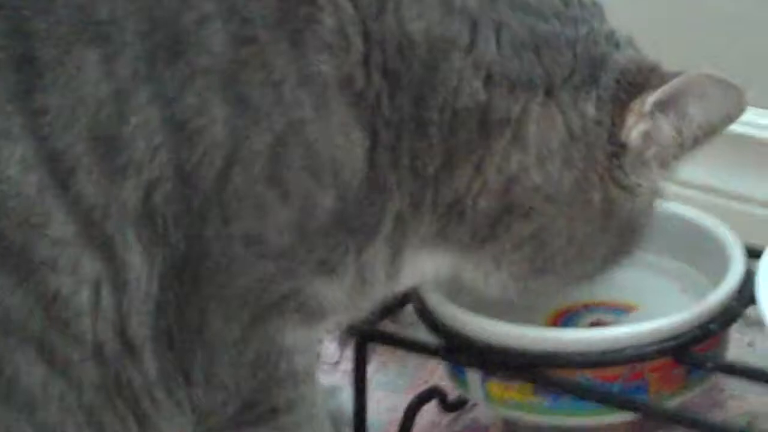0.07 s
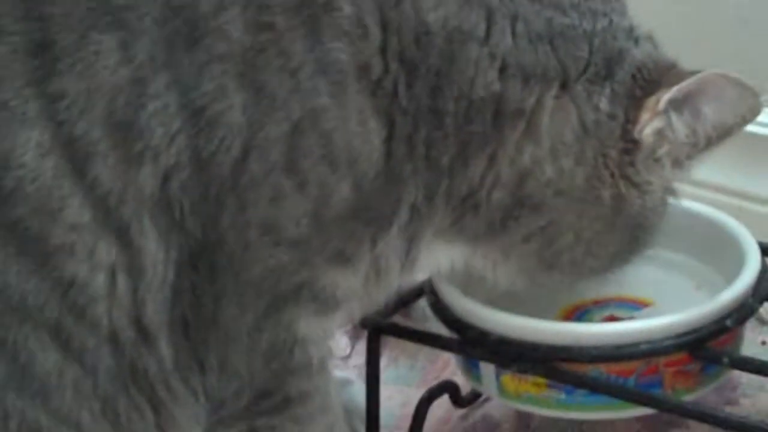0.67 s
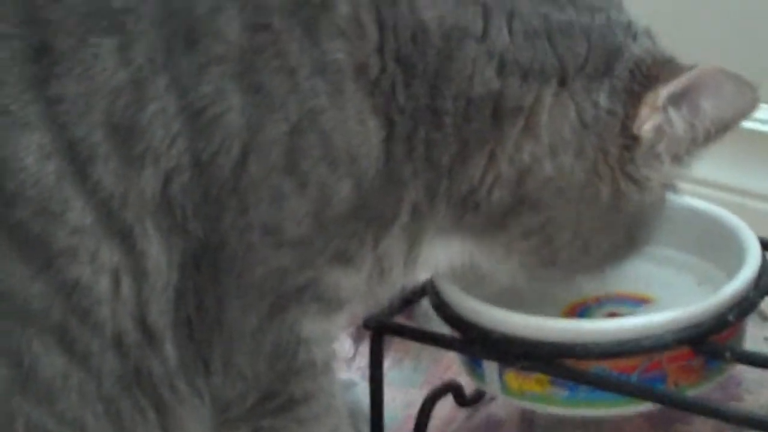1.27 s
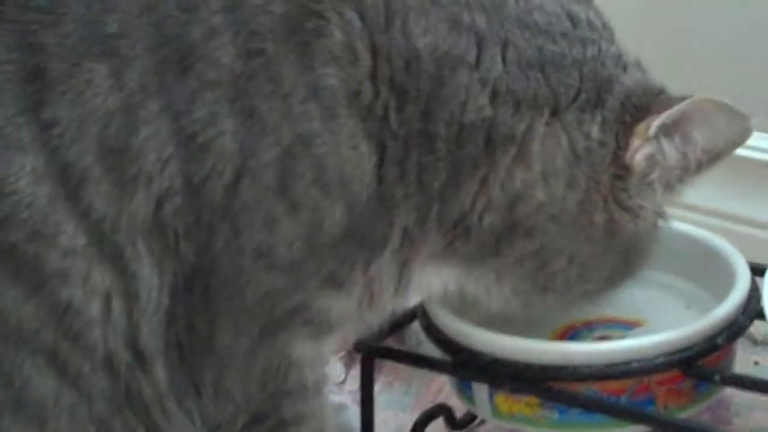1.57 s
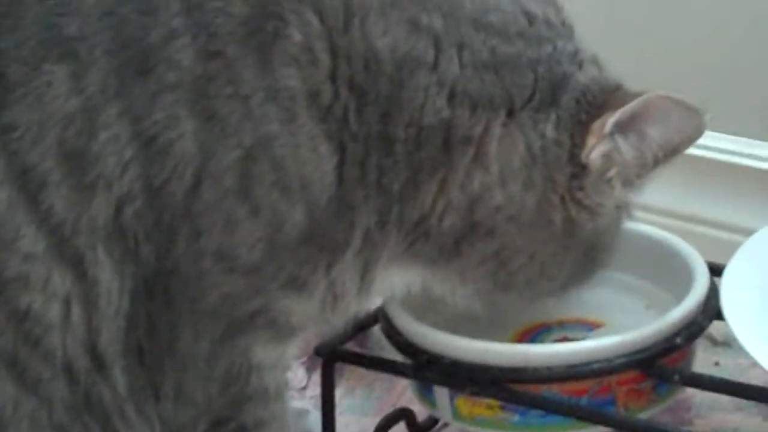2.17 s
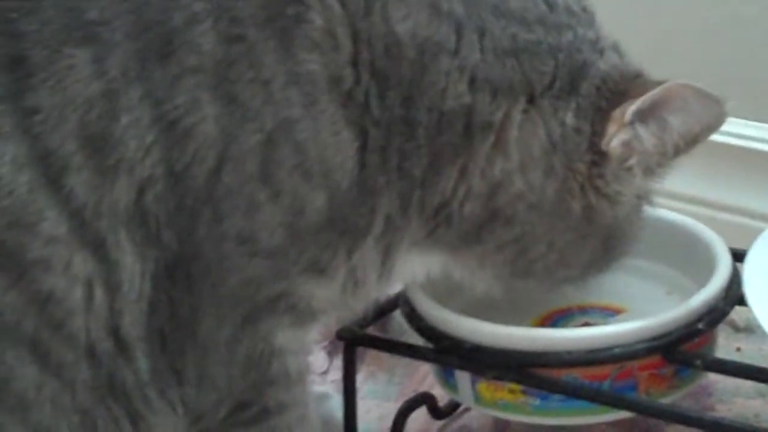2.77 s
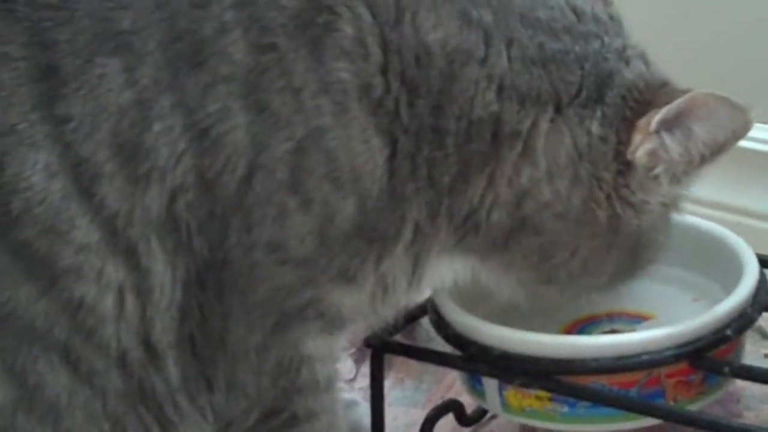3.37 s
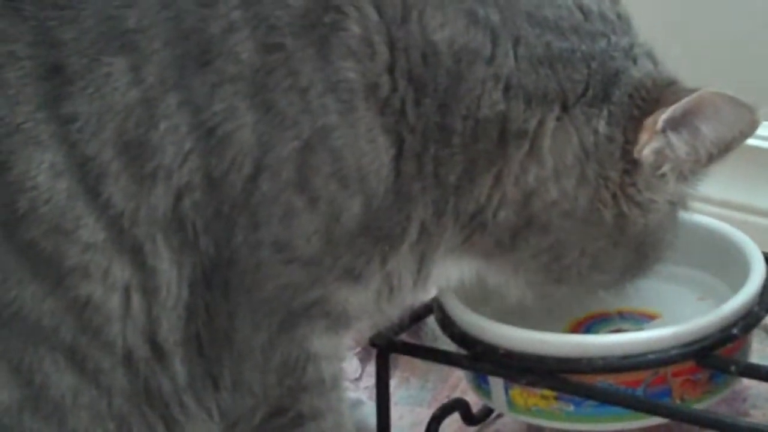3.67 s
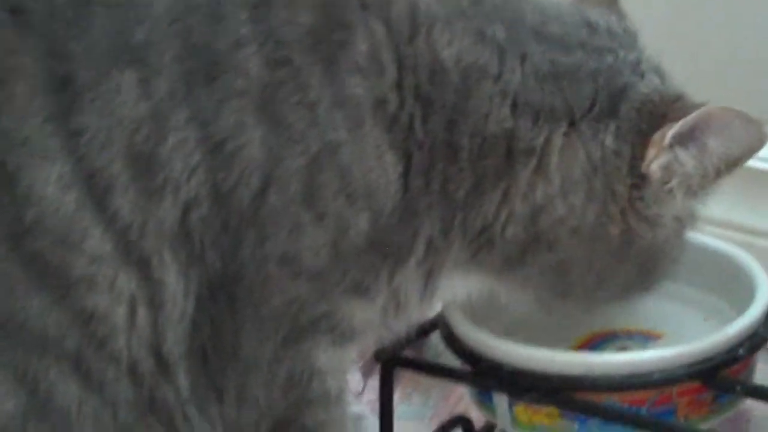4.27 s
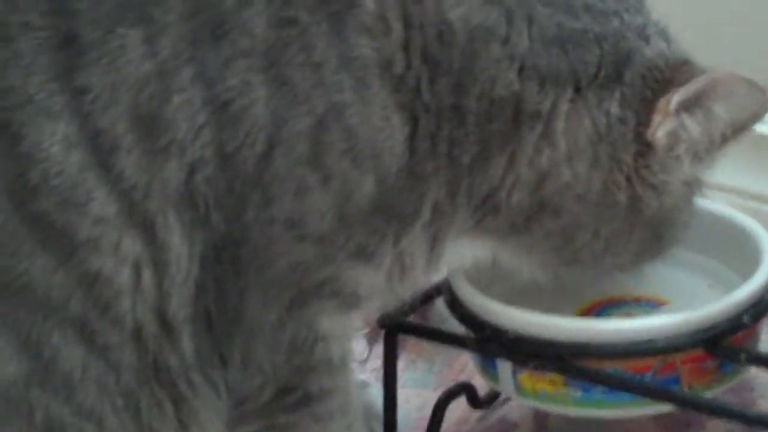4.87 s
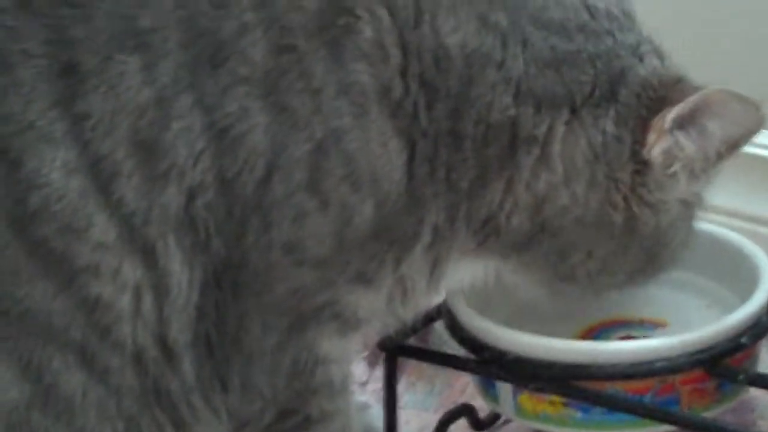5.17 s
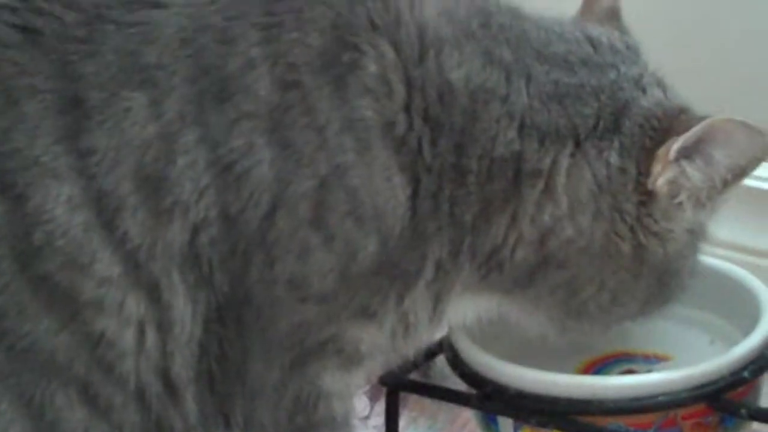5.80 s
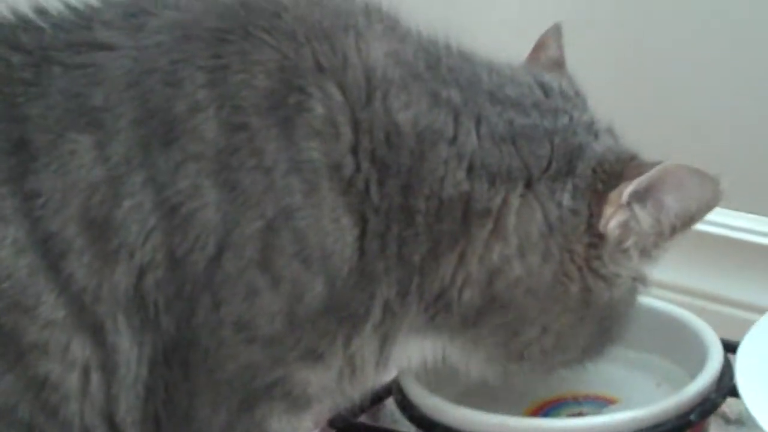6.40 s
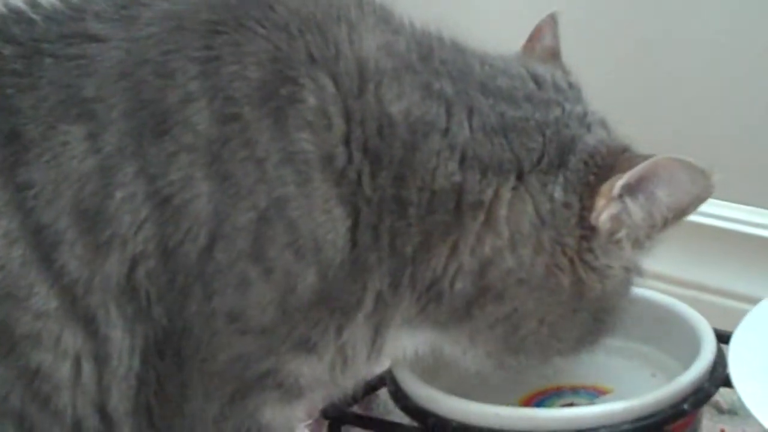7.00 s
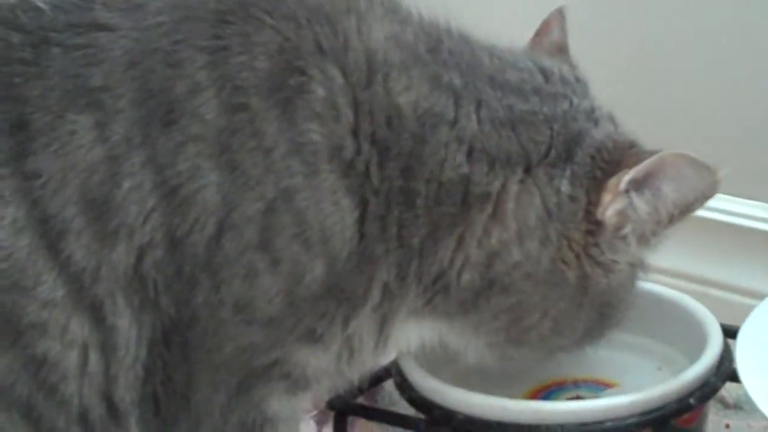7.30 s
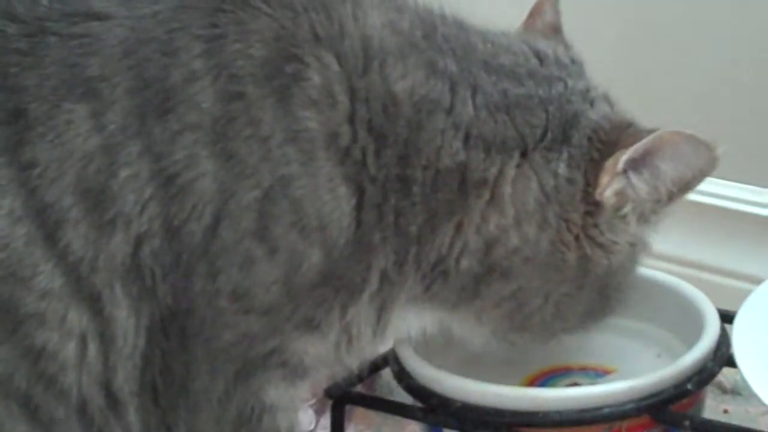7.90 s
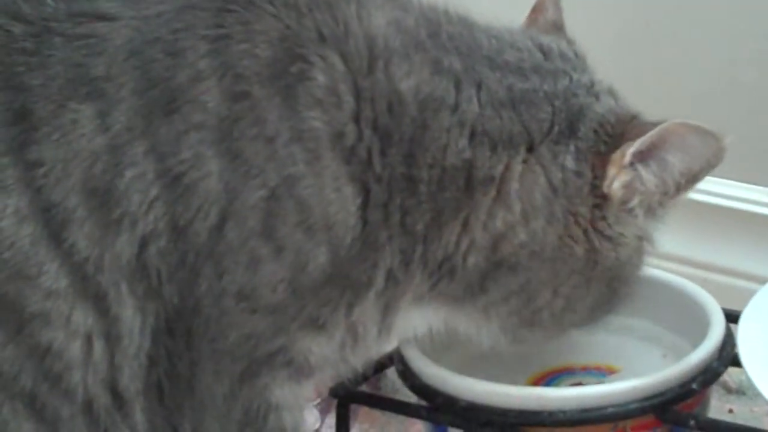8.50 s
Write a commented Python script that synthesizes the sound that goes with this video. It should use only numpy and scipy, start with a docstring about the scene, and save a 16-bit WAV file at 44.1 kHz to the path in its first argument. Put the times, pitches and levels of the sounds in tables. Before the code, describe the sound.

A cat laps water softly while a small metal tag tinkles, with a few bumps and a knock over steady hiss.

```python
"""In a quiet room with steady hiss and a faint hum, a cat laps water from a ceramic bowl in a wire stand.
Tiny films of water burst on its tongue and ring in its mouth. A small metal tag swings, strikes and
tinkles as its head moves. Early on there is a swish with a long fading hiss. Soft bumps and a few
sharp ticks come and go, and near the end something hard knocks and drops back once."""
import sys
import numpy as np
from scipy import signal
from scipy.fft import rfft, irfft
from scipy.io import wavfile
from scipy.ndimage import uniform_filter1d

SR = 44100
rng = np.random.default_rng(int(sys.argv[2]) if len(sys.argv) > 2 else 0)


def dump_mix(stems):
    """Bounce the given channels to the path in sys.argv[1] as a 16-bit WAV at rate SR."""
    frames = np.atleast_2d(stems).T  # one column per channel
    limited = np.clip(frames, -1, 1)  # hard clip at full scale
    pcm = np.round(limited * 32767).astype(np.int16)
    wavfile.write(sys.argv[1], SR, pcm)


N = 381465

# tone colour of one tiny splash, also used for the ticks: f/Hz, level/dB
SPLASH_SPECTRUM = [(200, -27), (800, -7.5), (1500, -2.5), (3000, -1), (7000, -3), (10000, -10.5),
                   (14000, -16)]


def amp(db):
    """Turns decibels into a gain."""
    return 10 ** (np.asarray(db) / 20)


def unit(x):
    """Scales a sound to energy 1."""
    return x / np.sqrt(np.sum(x ** 2) + 1e-20)


def ramp(x):
    """Holds a rising or falling line between 0 and 1."""
    return np.clip(x, 0, 1)


def read(points, hz):
    """Reads between the rows of a table, on a logarithmic frequency axis."""
    f, value = np.transpose(points)
    return np.interp(np.log(hz + 1), np.log(f + 1), value)


def add(mix, start_s, sound):
    """Mixes a sound in at the given time."""
    part = mix[round(start_s * SR):][:len(sound)]
    part += sound[:len(part)]


def noise(spectrum):
    """Noise with this tone colour and an average (rms) size of 1."""
    gain = amp(read(spectrum, np.fft.rfftfreq(N, 1 / SR)))
    return np.sqrt(N) * unit(irfft(rfft(rng.standard_normal(N)) * gain, N))


def click(spectrum, size=8192):
    """The sharpest click that has this tone colour."""
    log_gain = np.log(amp(read(spectrum, abs(np.fft.fftfreq(size, 1 / SR)))))
    return unit(np.fft.ifft(np.exp(np.conj(signal.hilbert(log_gain)))).real)


def ring(modes, size=8192):
    """The tones of a struck thing; each dies by 60 dB in its fade time."""
    t = np.arange(size) / SR
    return unit(sum(amp(db - 60 * t / fade_s) * np.sin(2 * np.pi * (hz * t + rng.random()))
                    for hz, db, fade_s in modes))


def resonate(x, hz, q):
    """Keeps the sound near one pitch; a higher q keeps a narrower band."""
    return signal.lfilter(*signal.iirpeak(min(hz, SR / 4), max(q, .5), SR), x)


def soften(x, top_hz, order=3):
    """Dulls the sound above top_hz."""
    return signal.lfilter(*signal.butter(order, min(top_hz, SR / 3), fs=SR), x)


def patter(length_s, per_s, spread_db, size=8192):
    """A cluster of tiny hits that swells quickly and dies away."""
    age = (1 + np.arange(size)) / SR / (length_s / 2)
    hits = rng.random(size) < per_s / SR
    hits[round(length_s / 4 * SR) % size] = True  # always one hit at the peak
    sizes = rng.choice([-1, 1], size) * amp(spread_db * np.minimum(rng.exponential(1, size), 3))
    return unit(hits * sizes * np.sqrt(age) * np.exp(-age))


def room(x, echo_db, build_s=0.00059):
    """Adds dense echoes from the near walls and floor; the treble dies first."""
    # how long the echoes last: f/Hz, fade time/s
    fade_times = [(150, 0.71), (400, 0.37), (1000, 0.28), (2700, 0.26), (7000, 0.26), (13000, 0.1)]
    hz, t, bands = signal.stft(rng.standard_normal(SR), SR, nperseg=256)
    tail = signal.istft(bands * amp(-60 * t / read(fade_times, hz)[:, None]), SR, nperseg=256)[1]
    tail *= 1 - np.exp(-(np.arange(len(tail)) / SR / build_s) ** 2)
    return x + amp(echo_db) * signal.fftconvolve(x, unit(tail))[:N]


def background(hiss_db=-55, waver_hz=2.145):
    """Even hiss and a few faint hum tones that waver."""
    # tone colour of the hiss: f/Hz, level/dB
    hiss_spectrum = [(20, 0.5), (35, -33), (60, -11.5), (120, -19), (160, -19), (240, -9), (310, -13),
                     (390, -7), (480, -9), (750, -11), (1150, -9), (1700, -12), (2300, -10), (7000, -11.5),
                     (10000, -13.5), (14000, -20.5)]
    # tones of the hum: f/Hz, level/dB
    hum_tones = [(118.4, -83.5), (360.7, -75), (409.5, -70.5), (600, -74), (1115, -75), (1174, -68.5)]
    out = amp(hiss_db) * noise(hiss_spectrum)
    for hz, db in hum_tones:
        drift = np.sqrt(N) * unit(uniform_filter1d(rng.standard_normal(N), size=1500))
        out += amp(db) * np.sqrt(2) * np.sin(2 * np.pi * np.cumsum(hz + waver_hz * drift) / SR)
    return out


def swish(start_s=1.354, swish_db=-33.5, rise_s=0.055, hold_s=0.038, fall_db_per_s=145,
          hiss_db=-49.5, hiss_rise_s=.19, hiss_fade_s=1.92):
    """A short broad swish, then a thin, faintly whistling hiss that slowly fades."""
    # tone colours of the swish and of its hiss: f/Hz, level/dB
    swish_spectrum = [(59, -65), (100, -36), (320, -12), (426, -18), (499, -12), (574, -14.5), (804, -0.5),
                      (1060, -5), (1220, -0.5), (2490, -5.5), (3710, -1), (4180, -5), (6860, -8),
                      (11500, -19), (15000, -50), (22000, -120)]
    hiss_spectrum = [(300, -9.5), (1900, -2), (2600, 0.5), (4000, 1), (8000, -1), (11500, -5.5),
                     (14000, -18)]
    # whistles in the hiss: f/Hz, width/Hz, level compared with the hiss/dB
    whistles = [(2743, 32, 0), (3710, 90, 2), (5030, 200, -4)]
    t = np.arange(N) / SR - start_s
    burst = ramp(t / rise_s) ** 2 * amp(swish_db - fall_db_per_s * np.maximum(t - rise_s - hold_s, 0))
    fade = amp(hiss_db) * ramp(t / hiss_rise_s) ** 2 * ramp(1 - (t - hiss_rise_s) / hiss_fade_s)
    hiss = noise(hiss_spectrum)
    hiss = hiss + sum(amp(db) * resonate(hiss, hz, hz / width) for hz, width, db in whistles)
    return room(noise(swish_spectrum) * burst, echo_db=-6) + hiss * fade


def bumps(width_hz=290):
    """Low, padded pushes; all are damped alike, so the higher ones sound hollow."""
    # soft contacts: t/s, level/dB, f/Hz, length/s
    contacts = [(.675, -27.5, 940, 0.017), (2.258, -17, 280, .012), (5.136, -28, 400, .025),
                (5.563, -17, 550, 0.071), (5.605, -27, 243, .025), (5.619, -19.5, 570, .03),
                (6.21, -27.5, 710, .008), (6.271, -28.5, 623, 0.029), (7.479, -27.5, 353, 0.017),
                (7.938, -27.5, 604, 0.048), (8.009, -15.5, 268, 0.049), (8.26, -33, 330, .03)]
    out = np.zeros(N)
    for s, db, hz, length_s in contacts:
        push = resonate(patter(length_s, per_s=1500, spread_db=1), hz, q=.5)
        add(out, s, amp(db) * unit(resonate(push, hz, hz / width_hz)))
    return room(out, echo_db=-7)


def knocks(clack_hz=2050, clack_db=-2, ring_db=-4, rattle_s=.009, rattle_delay_s=0.00197):
    """A hard clack, a brief rattle and a hollow ring; the second blow is a longer contact, so duller."""
    # blows: t/s, level/dB, dull above f/Hz, level of rattle and ring compared with the clack/dB
    blows = [(8.1, 7, 10000, 3), (8.1786, 6.5, 1190, -8)]
    # tones of the knocked thing: f/Hz, level/dB, fade time/s
    tones = [(661, -10, .14), (755, -10, 0.094), (887, -5, 0.089), (1086, -0.5, 0.093), (1324, 0, 0.16),
             (1560, -7, 0.11), (1727, 3, .13), (1830, 2, 0.1), (2178, 1.5, 0.095), (2380, 1, 0.15),
             (2690, -10, 0.11), (2784, -5.5, .13), (3020, -8, 0.13), (3310, -4, .07)]
    # tone colour of the hard contact: f/Hz, level/dB
    crack_spectrum = [(60, -38), (110, -27), (180, -15), (400, -13), (750, -3), (960, -6.5), (1300, -3),
                      (2000, 2.5), (2700, -2.5), (3600, -7.5), (4600, -17), (6800, -21), (9000, -29),
                      (14000, -39)]
    out = np.zeros(N)
    crack = click(crack_spectrum)
    clack = unit(crack + amp(clack_db) * unit(resonate(crack, clack_hz, q=4.8)))
    for s, db, top_hz, rattle_db in blows:
        blow = clack + amp(ring_db + rattle_db) * ring(tones)
        rattle = unit(signal.fftconvolve(patter(rattle_s, per_s=5000, spread_db=-0.5), crack))
        add(blow, rattle_delay_s, amp(rattle_db) * rattle)
        add(out, s, amp(db) * soften(blow, top_hz))
    return room(out, echo_db=-6)


def ticks(body_hz=5000, ring_hz=3250, fade_s=0.028, ring_db=-7):
    """Single hard, bright contacts with a short ring."""
    # sharp contacts: t/s, level/dB
    contacts = [(4.919, -31), (5.5888, -14.5), (5.611, -18)]
    out = np.zeros(N)
    snap = unit(resonate(click(SPLASH_SPECTRUM), body_hz, q=0.57))
    tick = unit(snap + amp(ring_db) * ring([(ring_hz, 0, fade_s)]))
    for s, db in contacts:
        add(out, s, amp(db) * tick)
    return room(out, echo_db=-4)


def tag_strike(chatter_s=.009, click_db=-4):
    """The metal tag chatters briefly and rings very high."""
    # tones of the tag: f/Hz, level/dB, fade time/s
    tones = [(7450, -1, .13), (7520, -5, 0.042), (7880, -21, .036), (9340, -21, .033), (12000, 3, .054),
             (12130, 0.5, .08), (12140, -1, .1)]
    # tone colour of its click: f/Hz, level/dB
    click_spectrum = [(500, -45), (2500, -25), (6300, -12.5), (7700, 1.5), (9800, -9.5), (11300, -6),
                      (12100, 2), (12700, -20), (14000, -28)]
    chatter = patter(chatter_s, per_s=5000, spread_db=2.5)
    tinkle = unit(sum(amp(db) * unit(signal.fftconvolve(chatter, ring([(hz, 0, fade_s)])))
                      for hz, db, fade_s in tones))
    clicks = unit(signal.fftconvolve(chatter, click(click_spectrum)))
    return unit(tinkle + amp(click_db) * clicks)


def tag(half_swing_s=.146, bounce_s=0.014, full_bounce_db=-12):
    """The tag strikes on its way out and again on its way back; each strike bounces once."""
    # swings: t/s, level/dB, level of the back strike compared with the first/dB
    swings = [(0.295, -24, -3), (.594, -24, -16), (1.315, -10.5, -7), (1.517, -17.5, -13),
              (1.734, -22, -15), (2.627, -12.5, -17), (3.001, -22, -18), (3.099, -23.5, -9),
              (3.9, -26, -16), (4.002, -16, -10), (5.62, -11.5, -1), (5.949, -23, -20)]
    out = np.zeros(N)
    for start, first_db, back_db in swings:
        for s, db in [(start, first_db), (start + half_swing_s, first_db + back_db)]:
            add(out, s, amp(db) * tag_strike())
            bounce_loss_db = full_bounce_db - db  # lighter strikes lose more
            add(out, s + bounce_s, amp(db - bounce_loss_db) * tag_strike())
    return room(out, echo_db=-1.5)


def lap(mouth_hz, length_s):
    """Tiny films of water burst on the tongue and ring in the mouth."""
    spray = unit(signal.fftconvolve(patter(length_s, per_s=3500, spread_db=0.5), click(SPLASH_SPECTRUM)))
    mouth_db = 5 - 480 * length_s  # short smacks ring, long slurps are mostly spray
    return unit(spray + amp(mouth_db) * unit(resonate(spray, mouth_hz, q=3.2)))


def lapping(period_s=.226, jitter_s=0.0087, spread_db=-0.5, mouth_hz=2110, spread_octaves=0.1):
    """The tongue keeps a quiet rhythm in short runs; now and then it slurps or smacks."""
    # louder slurps and smacks: t/s, level/dB, mouth f/Hz, length/s
    slurps = [(.392, -25, 1830, 0.016), (0.473, -21.5, 2560, 0.096), (0.72, -19.5, 1740, .053),
              (1.309, -21, 3660, 0.0094), (1.345, -23, 2500, .011), (2.944, -25, 2600, 0.041),
              (3.207, -21.5, 1700, 0.03), (3.5, -28, 1600, .018), (3.712, -18.5, 1450, .016),
              (4.699, -29, 2080, 0.0038), (4.759, -27.5, 2060, .006), (5.118, -25.5, 2700, 0.018),
              (5.759, -19.5, 1400, .017), (5.822, -25, 3070, .017), (5.95, -20.5, 2720, 0.011),
              (6.256, -25, 1500, 0.026), (6.906, -19, 1640, 0.019), (7.268, -28.5, 2200, .0065),
              (7.58, -27, 2180, 0.033), (7.922, -15.5, 2070, 0.062), (8.006, -21, 1470, 0.018)]
    # runs of even lapping: first t/s, end t/s, level/dB
    runs = [(0.549, 1.15, -29.5), (4.225, 5.45, -31), (6.14, 7.8, -31)]
    out = np.zeros(N)
    for s, db, hz, length_s in slurps:
        add(out, s, amp(db) * lap(hz, length_s))
    for first, end, db in runs:
        for k, (late, size, pitch) in enumerate(rng.standard_normal((8, 3))):  # up to 8 laps, each unique
            s = first + k * period_s + jitter_s * late
            gain = (s < end) * amp(db + spread_db * size)
            add(out, s, gain * lap(mouth_hz * 2 ** (spread_octaves * pitch), length_s=.03))
    return room(out, echo_db=0)


def scene():
    """All the sounds together, in one channel."""
    return (background() + tag() + lapping() + ticks() + bumps() + knocks() + swish())[None]


def record(dry, on_s=.075, wake_s=0.4, start_db=-0.5, dull_hz=2640, settle_s=0.12, top_hz=14000):
    """The microphone starts dull and opens up, adds low electrical pops and cuts the highest treble."""
    # sudden jumps of the signal's resting level: t/s, jump/full scale
    pops = [(.09, -0.034), (0.109, 0.016), (8.476, 0.005)]
    t = np.arange(N) / SR - on_s
    awake = ramp(t / wake_s)
    gain = (t > 0) * amp(start_db * (1 - awake))
    out = gain * (awake * dry[0] + (1 - awake) * soften(dry[0], dull_hz, order=1))
    settling = np.exp(-np.arange(SR) / SR / settle_s)
    pop = uniform_filter1d(np.pad(settling, 20), size=30)  # rounds off the sharp edge
    for s, jump in pops:
        add(out, s, jump * pop)
    treble_cut = signal.firwin(511, top_hz, window=("kaiser", 9), fs=SR)
    return signal.oaconvolve(out, treble_cut, "same")[None]


dry = scene()
out = record(dry)
dump_mix(out)
```